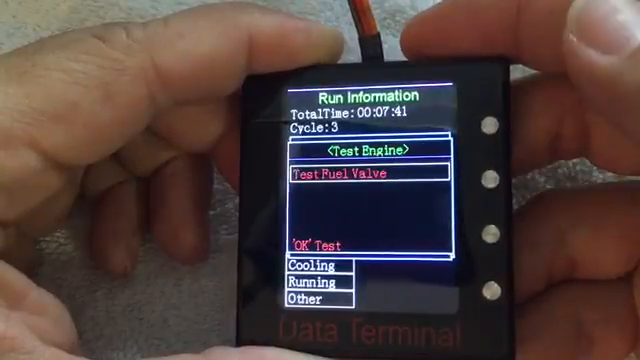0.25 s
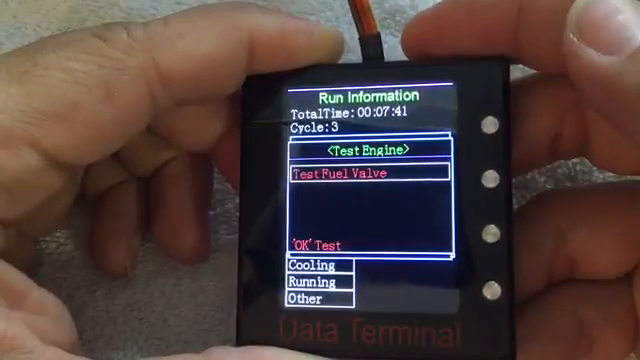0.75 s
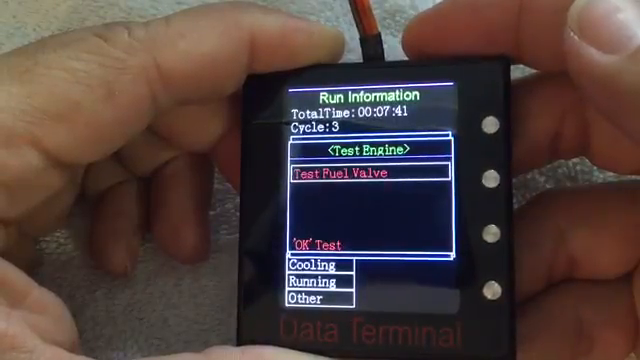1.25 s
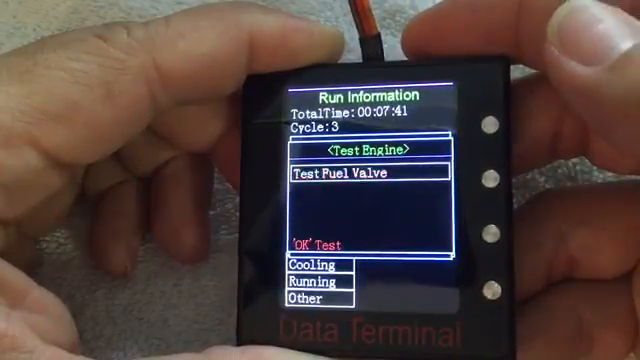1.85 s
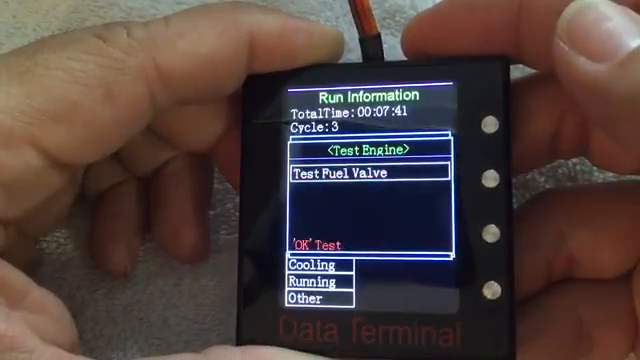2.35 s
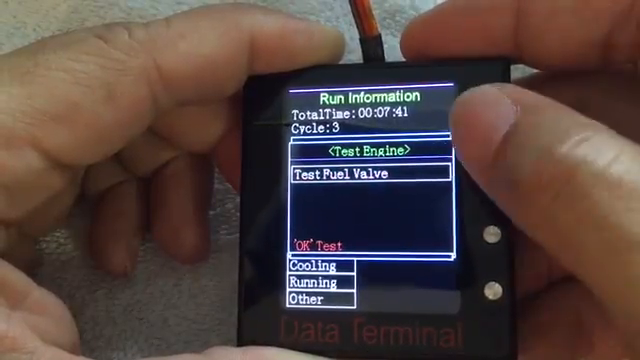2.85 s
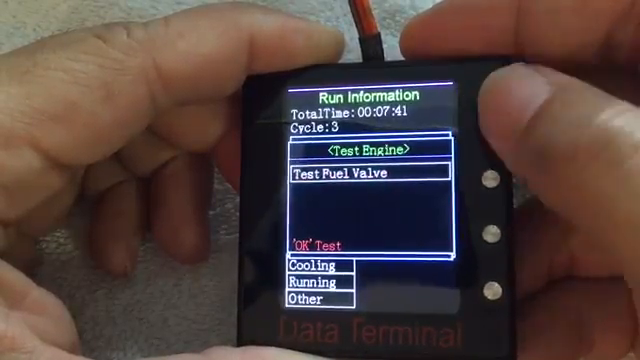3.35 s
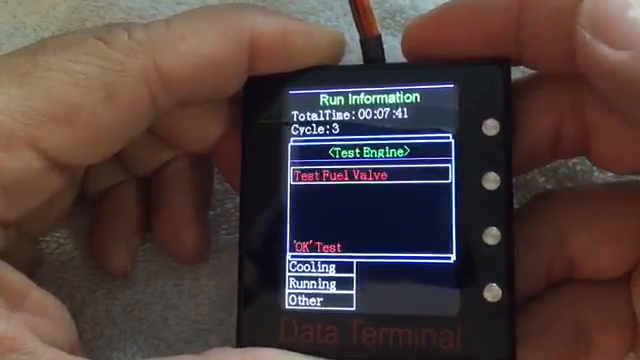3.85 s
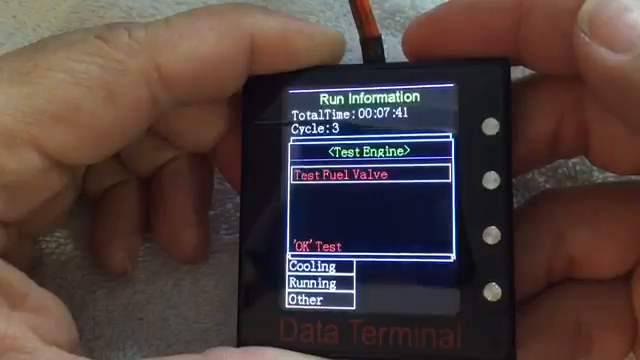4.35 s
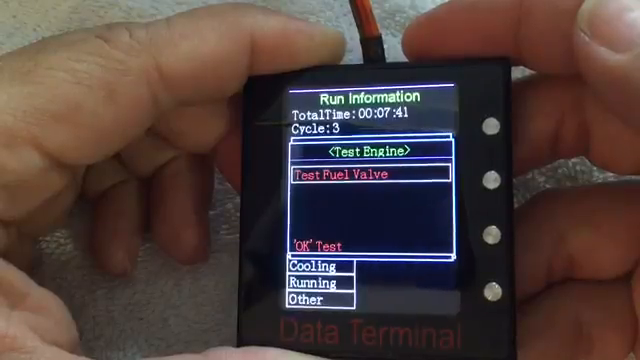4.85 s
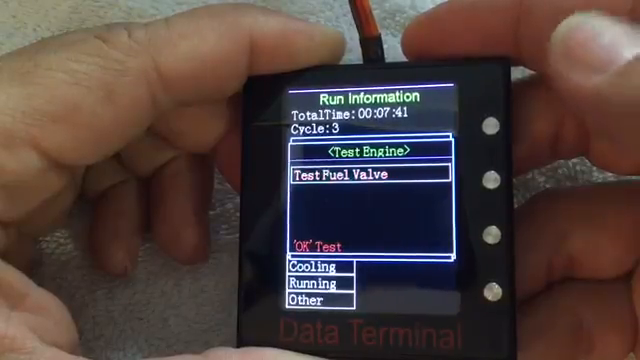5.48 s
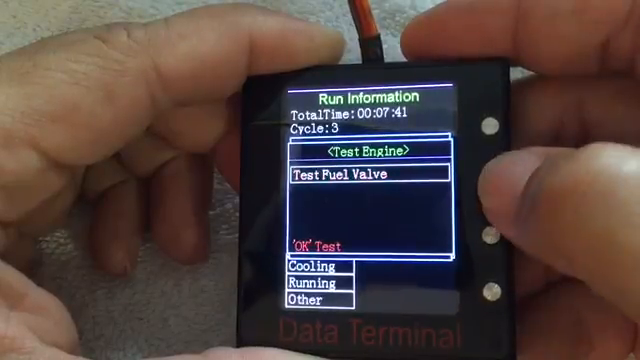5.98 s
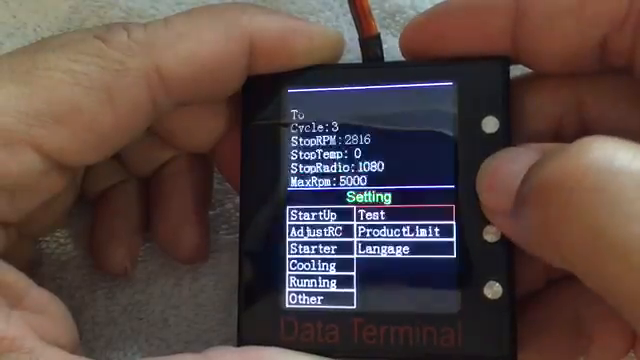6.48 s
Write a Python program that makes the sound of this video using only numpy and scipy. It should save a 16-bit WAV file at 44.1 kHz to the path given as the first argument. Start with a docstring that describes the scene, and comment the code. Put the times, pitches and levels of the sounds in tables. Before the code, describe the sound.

Close up in a small room, a solenoid valve makes five crisp clicks, bright opening snaps alternating with thinner shutting ones. Only a faint low hum and hiss remain for a moment. Then the valve gives six more clicks at the same pace, joined early on by a light key click. Last comes the crisp press and duller release of a button on a plastic controller.

```python
"""A small room with a faint, low hum, its walls answering every click.
A thumb presses and releases the keys of a hand-held controller: each dome snaps and rings the
plastic case. Up close, a small solenoid valve under test snaps open and shut three times a run:
the coil slams the plunger onto its stop, and the spring throws it back onto the seat."""
import sys
import numpy as np
from scipy import signal
from scipy.fft import rfft, irfft, next_fast_len
from scipy.io import wavfile
from scipy.ndimage import map_coordinates

SR = 44100
rng = np.random.default_rng(int(sys.argv[2]) if len(sys.argv) > 2 else 0)


def to_wav(s):
    """Save 16-bit WAV."""
    ch = np.atleast_2d(s).T  # columns
    pcm = np.round(np.clip(ch, -1, 1) * 32767)  # PCM
    wavfile.write(sys.argv[1], SR, pcm.astype(np.int16))


N = 296352

# room tone, rumble up to hiss: f/Hz, relative spectral level/dB
AIR_SPECTRUM = [(15, -50), (28, -21.5), (50, -4.5), (100, -3), (160, -3), (190, -6), (245, -4.5),
                (300, -9.5), (480, -17), (770, -18), (1100, -19.5), (3060, -22), (8970, -28), (16000, -33)]
# low hum lines: f/Hz, rms level/dB, phase drift/rad
HUM_LINES = [(156.9, -79.5, 0.16), (202, -84.5, 1.9)]
# swells and fades of the highest hum line: t/s, relative level/dB
HUM_SWELL = [(0.0, -58), (0.15, -76.5), (0.84, -73), (0.88, -65.5), (1.74, -79), (1.93, -65), (2.11, -91),
             (2.19, -74), (2.94, -79), (3.01, -65), (3.37, -84), (3.65, -71.5), (5.09, -78.5), (5.35, -63),
             (5.45, -78), (6.57, -72), (6.61, -88), (6.72, -66)]
# reverb tail of the walls: f/Hz, t60/s, level/dB
WALL_DECAY = [(199.8, .35, -24.5), (450, .3, -20), (1500, 0.24, -14), (2850, 0.28, -18.5),
              (4270, 0.32, -18), (6300, 0.25, -26.5), (9050, .27, -21.5), (10800, 0.16, -20.5),
              (16000, .22, -21)]
# dull thumb knocks on the case: t/s, peak level/dB, half width/s
THUMB_KNOCKS = [(0.0295, -36.5, 0.00019)]
# modes of the plastic case: f/Hz, t60/s, press level/dB, release level/dB
CASE_MODES = [(920, 0.013, -25, -25), (1478, 0.012, -18.5, -14.5), (1592, 0.013, -18, -15.5),
              (1690, 0.017, -22, -16.5), (2620, 0.0075, -14, -12), (3012, 0.0097, -19, -18.5),
              (3380, 0.0082, -20, -22.5), (4093, 0.009, -14, -20.5), (5200, 0.0074, -13, -33.5),
              (6830, 0.0045, -8.5, -33.5), (7590, 0.0034, -11, -35.5), (8600, 0.0062, -10, -45),
              (9640, 0.0069, -17, -45), (11950, 0.0033, -8.5, -40.5), (13500, 0.0012, 2.5, -19.5)]
# presses, releases and light touches: t/s, relative level/dB, snap (0 dull release .. 1 crisp press)
KEY_HITS = [(0.0241, -31, 0.87), (0.0299, -26, 0.12), (.056, -34.5, 0.86), (2.8542, -44.5, 0.17),
            (3.3996, -42, 0.5), (3.5816, -36, .05), (3.6927, -9, 0.51), (3.7159, -33.5, 0.68),
            (6.405, -0.5, 0.92), (6.5433, 1, 0.018)]
# modes of the valve and its mount: f/Hz, t60/s, opening level/dB, shutting level/dB
VALVE_MODES = [(433.5, 0.083, -40.5, -48), (1640, .015, -37, -41.5), (2297, .045, -45.5, -40),
               (2396, .026, -41.5, -34.5), (2410, .18, -70, -61.5), (3550, 0.012, -36.5, -38.5),
               (3910, 0.038, -42, -41), (4030, 0.012, -16.5, -16), (4374, .0204, -20.5, -25),
               (4628, 0.014, -16.5, -17.5), (5024, 0.01, -32.5, -34), (5200, .06, -40, -44.5),
               (5554, 0.01, -14, -16.5), (5560, 0.16, -56.5, -61), (5790, 0.0061, -7.5, -24.5),
               (5950, 0.28, -53.5, -69.5), (6060, .0053, -70, -23), (6660, .0038, -3, -20.5),
               (8070, .0099, -23.5, -27), (9075, 0.0083, -23, -25), (9700, .0083, -25, -26.5),
               (11030, .014, -40, -28.5), (11115, 0.0047, -27.5, -16), (12330, 0.005, -20.5, -19.5),
               (13890, .01, -38, -31), (15586, .0021, -19.5, -11.5)]
# first opening of each test run: t/s
RUN_STARTS = [-.0324, 3.6176]

CYCLES_PER_RUN, CYCLE_S, HELD_OPEN_S = 3, .5973, .3014


def amp(db):
    """Decibels to gain."""
    return 10 ** (np.asarray(db) / 20)


def along(points, hz):
    """Read a curve of (f/Hz, value) points on a log frequency axis."""
    f, v = np.transpose(points)
    return np.interp(np.log(hz + 1), np.log(f + 1), v)


def wobble(rate):
    """Smooth random modulation, with rate knots a second."""
    knots = rng.standard_normal(int(N * rate / SR) + 4)
    return map_coordinates(knots, [np.arange(N) * rate / SR])


def filtered(x, response):
    """EQ x with a gain curve over frequency."""
    size = next_fast_len(N + SR // 2)
    return irfft(rfft(x, size) * response(np.fft.rfftfreq(size, 1 / SR)), size)[:N]


def add(track, s, sound):
    """Mix a sound into the track at time s."""
    start = round(s * SR)
    part = sound[max(-start, 0):N - start]
    track[max(start, 0):][:len(part)] += part


def room_tone(rms_db=-68.5):
    """A steady bed of soft rumble and hiss."""
    air = filtered(rng.standard_normal(N), lambda hz: amp(along(AIR_SPECTRUM, hz)))
    return amp(rms_db) * air / np.sqrt(np.mean(air ** 2))


def hum(waver_db=2.5, swell_hz=255):
    """Low tones waver in level and phase; the highest also swells and fades."""
    t = np.arange(N) / SR
    tone = lambda hz, drift: np.sqrt(2) * np.sin(2 * np.pi * hz * t + drift * wobble(8.7))
    lines = sum(amp(db + waver_db * wobble(6.9)) * tone(hz, drift) for hz, db, drift in HUM_LINES)
    swell_db = np.interp(t, *np.transpose(HUM_SWELL)) - 2 + waver_db * wobble(3.5)
    return lines + amp(swell_db) * tone(swell_hz, drift=1.9)


def room_response(predelay_s, splash_db, splash_t60):
    """Things close by scatter a brief splash; then the walls answer, each band dying at its own speed."""
    hz, t, noise = signal.stft(rng.standard_normal(SR // 2), SR, nperseg=256)
    table = np.array(WALL_DECAY)
    t60 = along(table[:, [0, 1]], hz)[:, None]
    level_db = along(table[:, [0, 2]], hz)[:, None]
    energy = SR * t60 / np.log(1e6)  # dividing this out keeps long tails from being louder
    decay = amp(level_db - 60 * t / t60) / np.sqrt(energy)
    _, tail = signal.istft(noise * decay, SR, nperseg=256)
    walls = np.pad(tail, (round(predelay_s * SR), 0))
    splash = np.pad(crack(lo_hz=1460, hi_hz=15500, t60=splash_t60), (SR // 500, 0))  # 2 ms late
    splash *= amp(splash_db) / np.linalg.norm(splash)
    return walls + np.pad(splash, (0, len(walls) - len(splash)))


def crack(lo_hz, hi_hz, t60):
    """An impact's transient: dense, unresolved modes as a fast-dying band of noise."""
    t = np.arange(SR // 3) / SR
    band = signal.butter(2, [lo_hz, hi_hz], "bandpass", fs=SR, output="sos")
    return signal.sosfilt(band, rng.standard_normal(len(t)) * amp(-60 * t / t60))


def ring(hz, t60, db, rise_s, low_cut_hz):
    """Damped modes of a small struck body, which radiates little bass."""
    t = np.arange(SR // 3) / SR
    modes = amp(db[:, None] - 60 * t / t60[:, None]) * np.sin(2 * np.pi * hz[:, None] * t)
    attack = 1 - np.exp(-t / rise_s)  # the blow spreads through the body
    low_cut = signal.butter(2, low_cut_hz, "highpass", fs=SR, output="sos")
    return signal.sosfilt(low_cut, modes.sum(axis=0) * attack)


def strike(ringing, impact, echoes, wet_db, crack_send_db):
    """Ring and crack arrive dry, then from the walls, which catch more of the crack."""
    wet = amp(wet_db) * signal.fftconvolve(ringing + amp(crack_send_db) * impact, echoes)
    return wet + np.pad(ringing + impact, (0, len(wet) - len(ringing)))


def thumb_knocks():
    """Soft flesh gives the case one push, with no ring."""
    t = np.arange(N) / SR
    track = np.zeros(N)
    for s, db, width in THUMB_KNOCKS:
        u = (t - s) / width
        track -= amp(db) * u * np.exp((1 - u ** 2) / 2)
    return track


def keys(echoes):
    """Each key's dome snaps against the case; a crisp press rings brighter than a release."""
    hz, t60, press_db, release_db = np.transpose(CASE_MODES)
    track = np.zeros(N)
    for s, db, snap in KEY_HITS:
        mode_db = snap * press_db + (1 - snap) * release_db
        ringing = ring(hz, t60, mode_db, rise_s=.0011, low_cut_hz=496.5)
        impact = amp(-23) * crack(lo_hz=1000, hi_hz=3200 + 5500 * snap, t60=.007)
        add(track, s, amp(db + 2) * strike(ringing, impact, echoes, wet_db=-11, crack_send_db=16))
    return track


def valve(echoes):
    """The plunger strikes at both ends of its travel, ringing the valve and its mount."""
    hz, t60, open_db, shut_db = np.transpose(VALVE_MODES)
    scatter_db = lambda: .4 * rng.standard_normal(len(hz))
    openings = [start + cycle * CYCLE_S for start in RUN_STARTS for cycle in range(CYCLES_PER_RUN)]
    track = np.zeros(N)
    for s in openings:
        # the coil slams the plunger onto its stop
        ringing = ring(hz, t60, open_db + scatter_db(), rise_s=.00073, low_cut_hz=280)
        impact = amp(-22) * crack(lo_hz=3670, hi_hz=8000, t60=.0047)
        add(track, s, amp(.12) * strike(ringing, impact, echoes, wet_db=1, crack_send_db=10))
        # the spring throws it back onto the seat with a thinner click
        ringing = ring(hz, t60, shut_db + scatter_db(), rise_s=.00081, low_cut_hz=285.5)
        impact = amp(-29) * crack(lo_hz=2720, hi_hz=15180, t60=.007)
        add(track, s + HELD_OPEN_S, strike(ringing, impact, echoes, wet_db=-1.5, crack_send_db=13))
    return track


def scene():
    """Valve and keys share one reverb, over the hum and room tone, in mono."""
    echoes = room_response(predelay_s=.008, splash_db=-20.5, splash_t60=.048)
    return (valve(echoes) + keys(echoes) + thumb_knocks() + hum() + room_tone())[None]


def record(dry):
    """A steep high cut takes off the very top of the treble."""
    high_cut_hz = 16100
    high_cut = lambda hz: 1 / np.sqrt(1 + (hz / high_cut_hz) ** 160)
    return np.array([filtered(channel, high_cut) for channel in dry])


dry = scene()
out = record(dry)
to_wav(out)
```